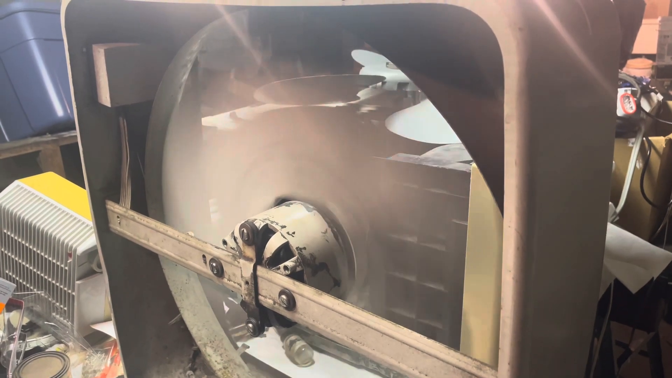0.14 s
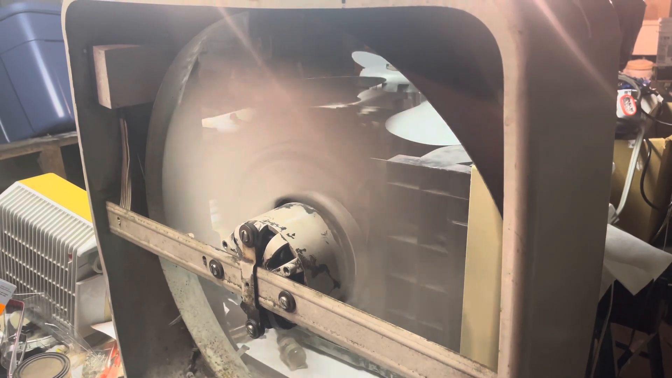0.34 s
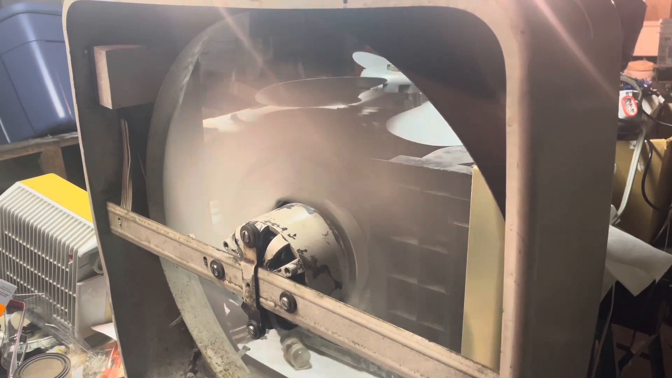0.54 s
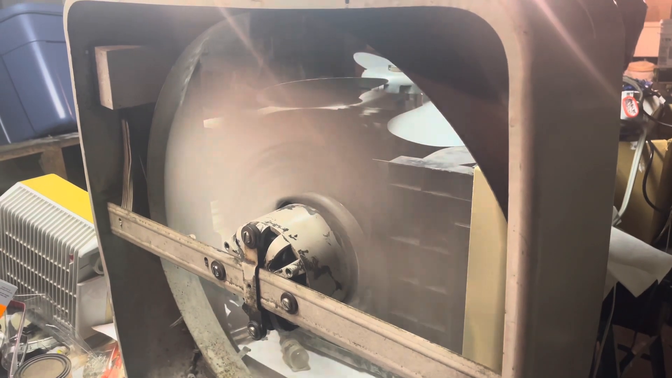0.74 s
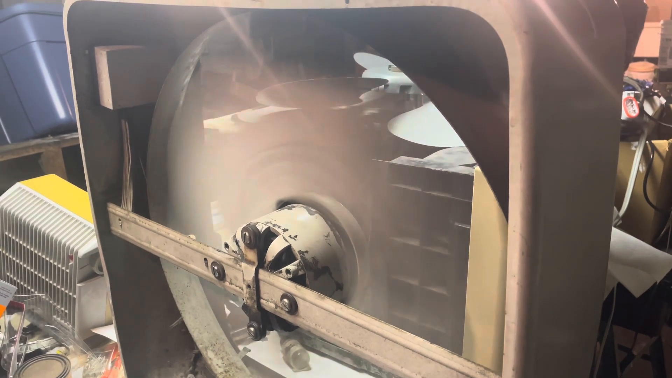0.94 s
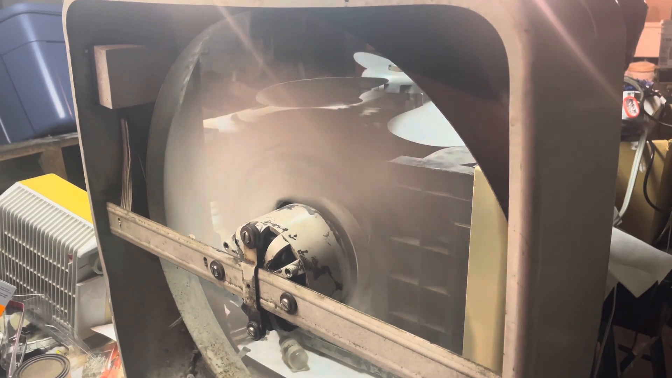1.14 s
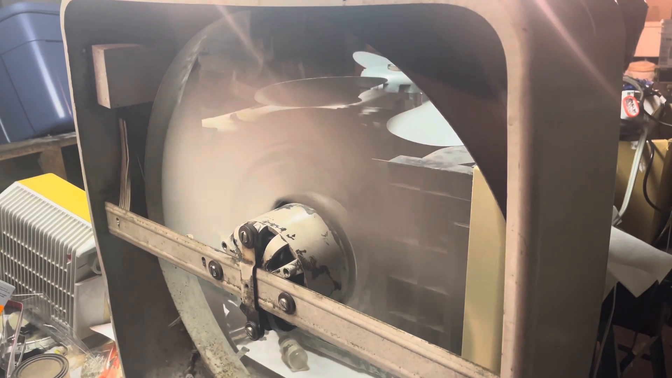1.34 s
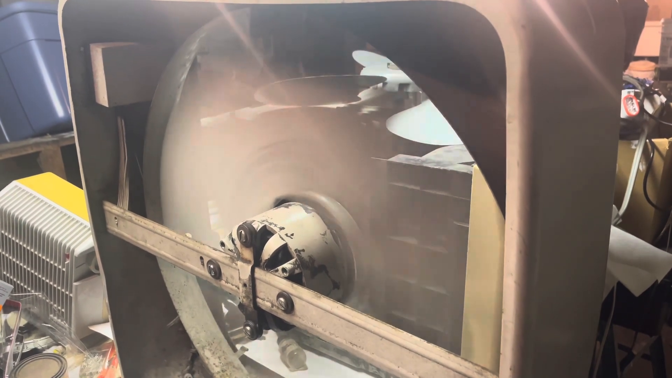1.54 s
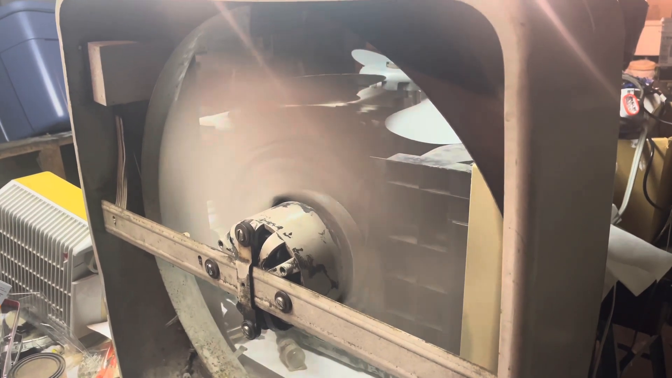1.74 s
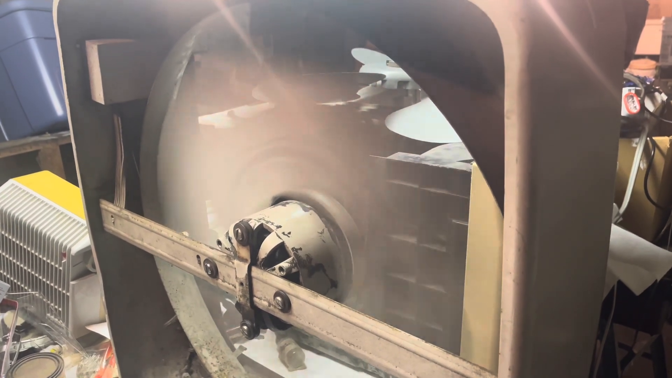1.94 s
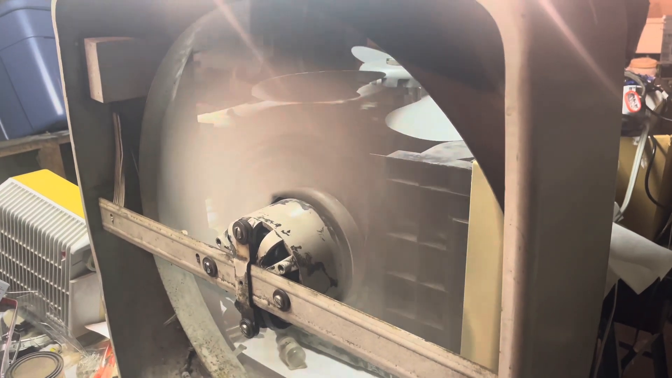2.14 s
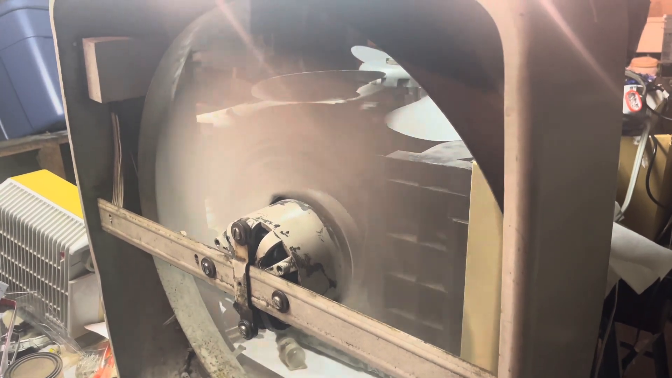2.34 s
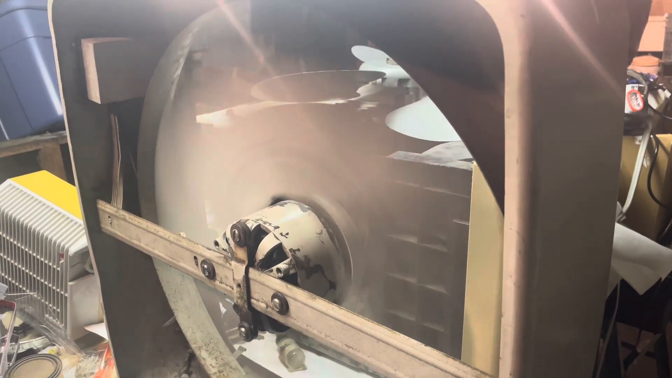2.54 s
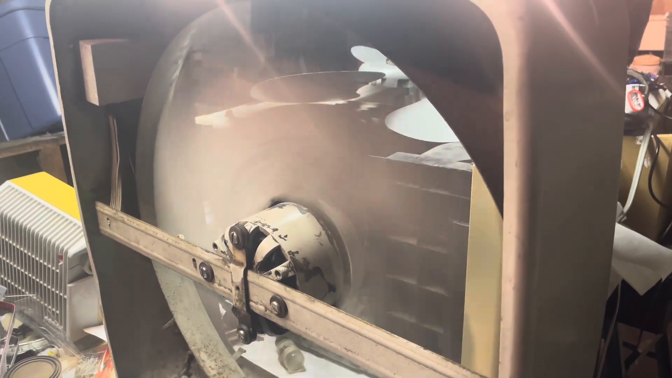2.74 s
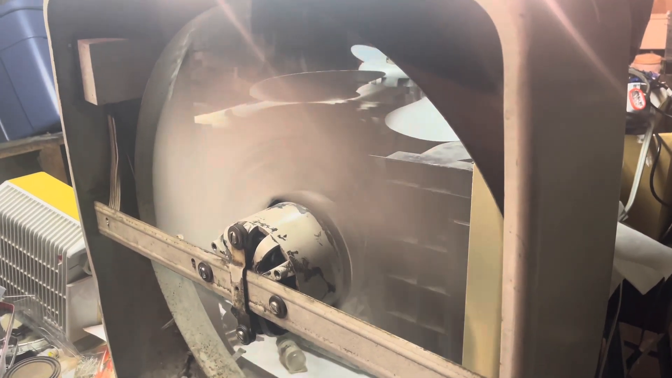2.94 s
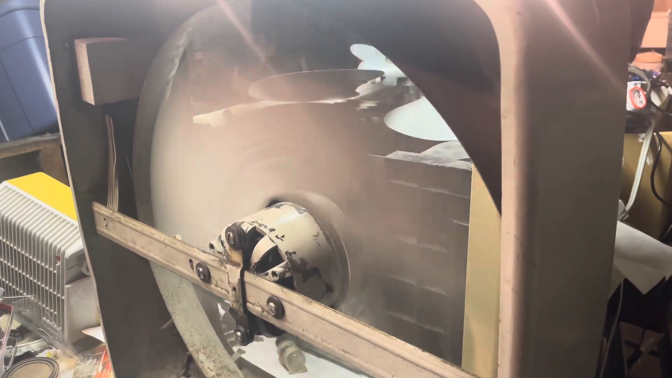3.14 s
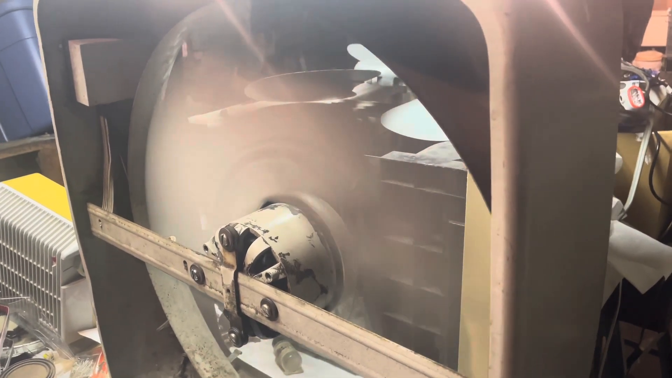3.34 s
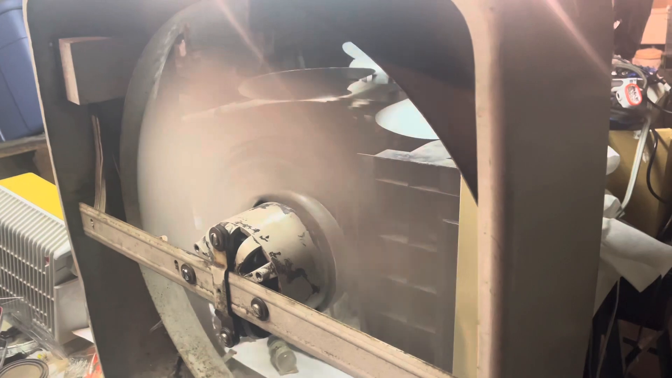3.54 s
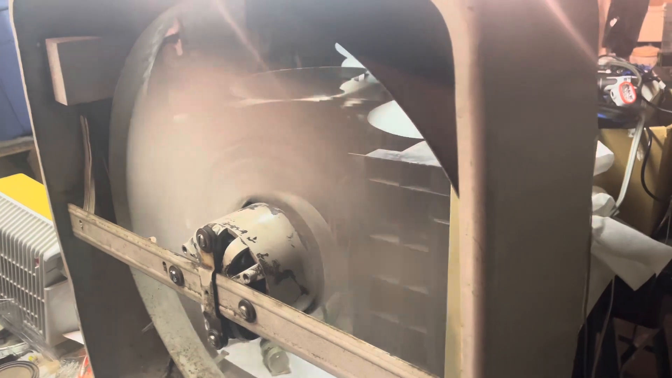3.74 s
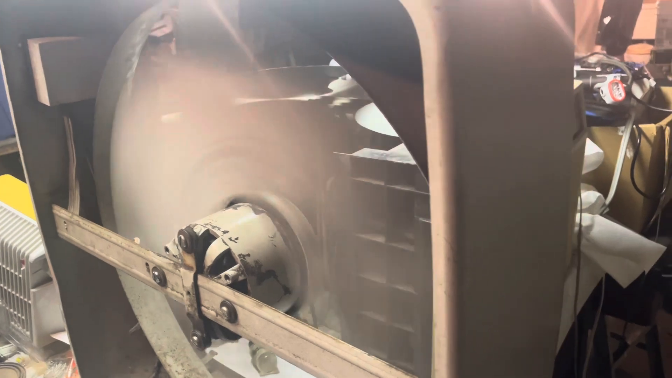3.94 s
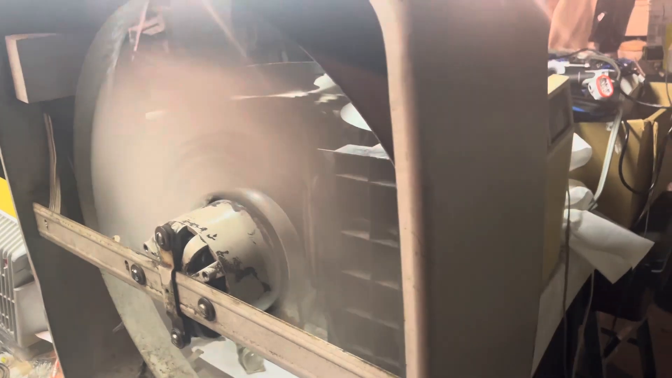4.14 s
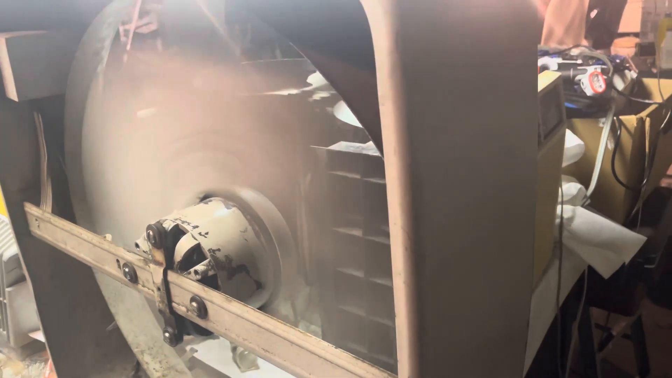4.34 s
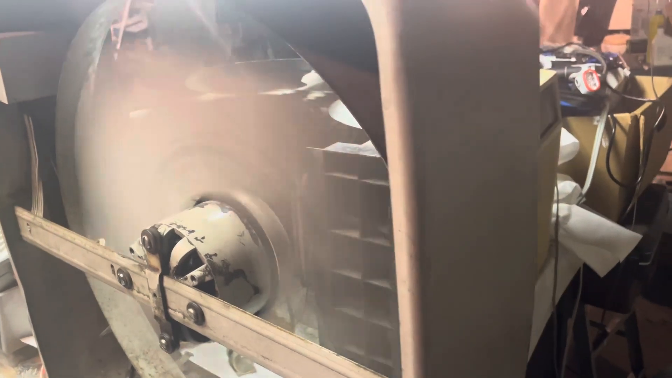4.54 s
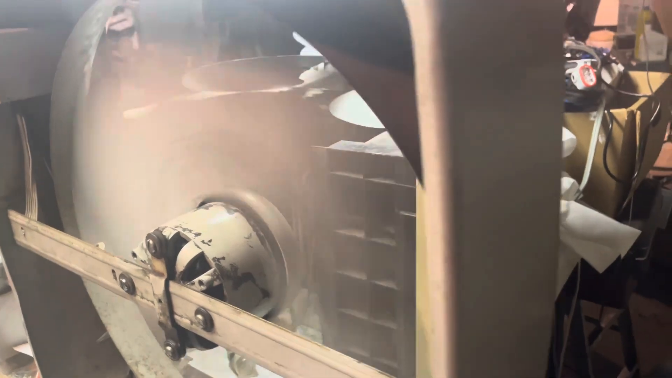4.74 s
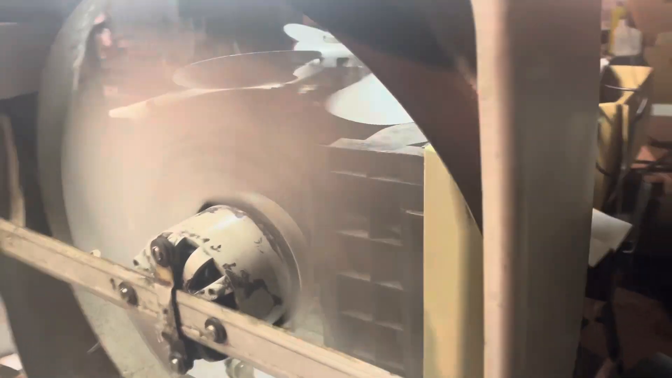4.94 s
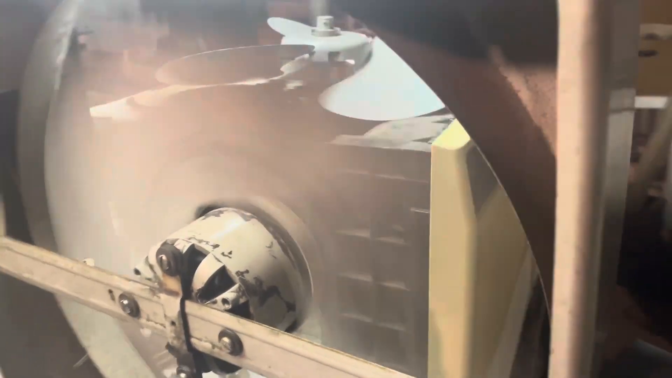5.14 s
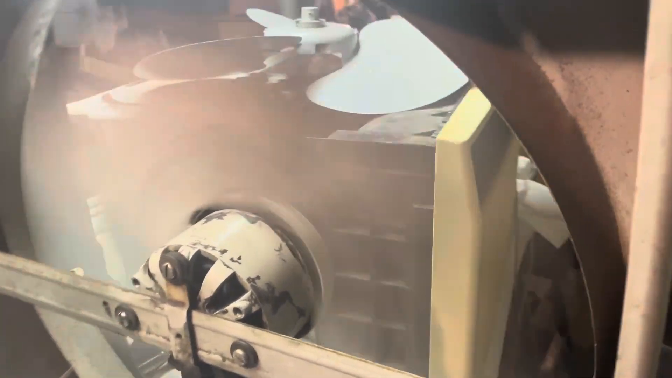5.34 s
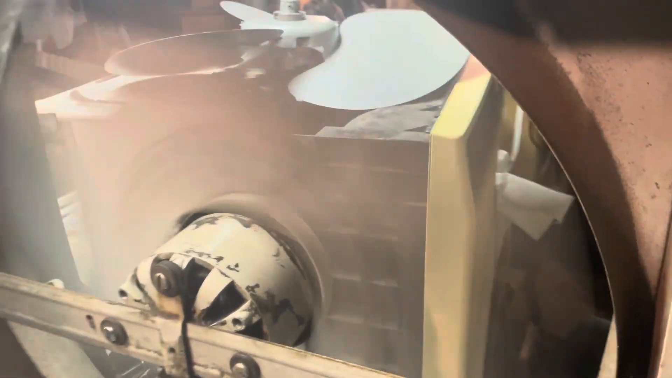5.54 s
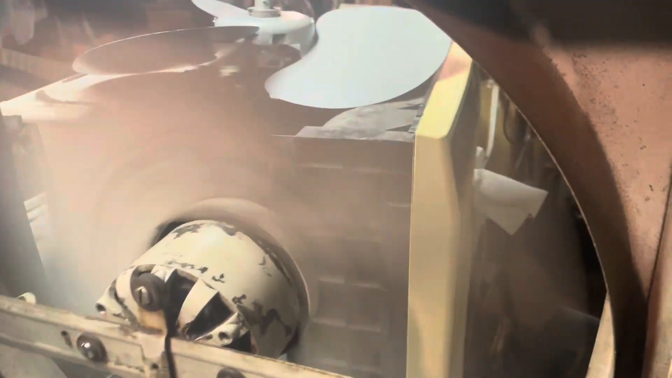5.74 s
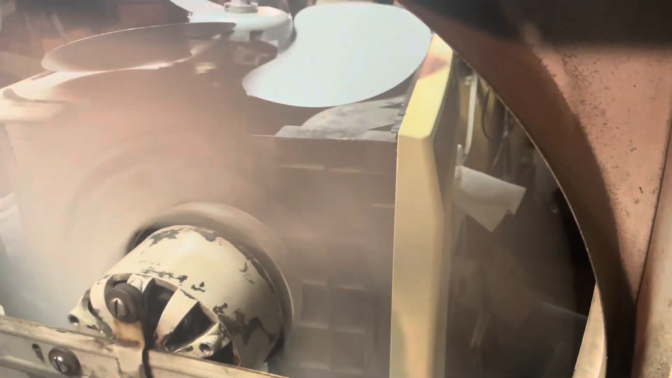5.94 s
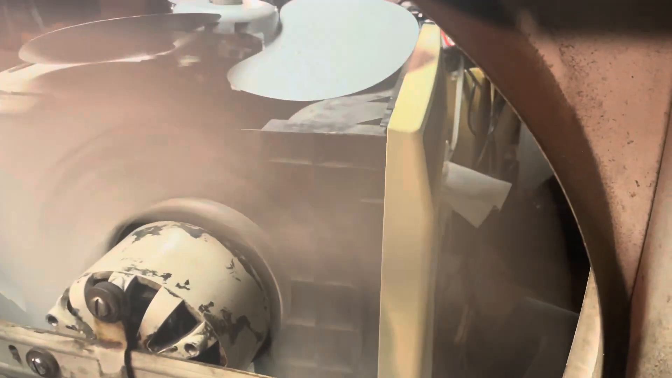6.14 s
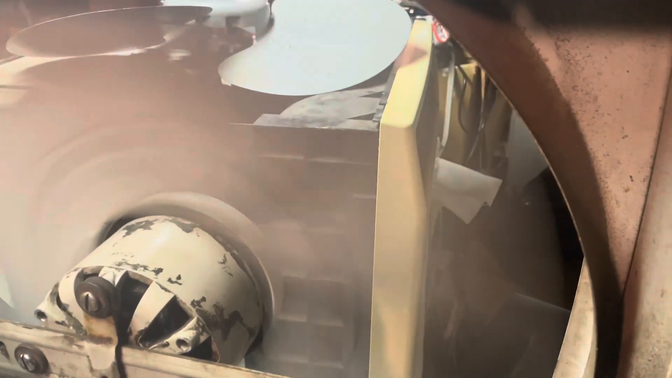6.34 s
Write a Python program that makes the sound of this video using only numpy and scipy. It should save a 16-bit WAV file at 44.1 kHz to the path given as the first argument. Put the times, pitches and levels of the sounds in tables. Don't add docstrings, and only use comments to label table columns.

```python
import sys
import numpy as np
from scipy import signal
from scipy.fft import rfft, irfft, next_fast_len
from scipy.io import wavfile
from scipy.ndimage import uniform_filter1d

SR = 44100
rng = np.random.default_rng(int(sys.argv[2]) if len(sys.argv) > 2 else 0)


def wrap_up_sound(samples):
    columns = np.atleast_2d(samples).T
    tamed = np.clip(columns, -1, 1)
    steps = np.round(tamed * 32767).astype(np.int16)
    wavfile.write(sys.argv[1], SR, steps)


def how_loud(loudness_db):
    steps = np.asarray(loudness_db, float) / 20
    return 10 ** steps


N = 286209
T = np.arange(N) / SR


def evened(x):
    return x / np.sqrt(np.mean(x ** 2) + 1e-20)


def columns(table, at, warp=np.asarray):
    key, *rest = np.transpose(table)
    return [np.interp(warp(at), warp(key), column) for column in rest]


def drift(rate_hz):
    coarse = T[::256]
    rates_hz = np.geomspace(.1, 1, num=12) * rate_hz
    slow = sum(np.sin(2 * np.pi * (f * coarse + rng.random())) for f in rates_hz)
    return np.interp(T, coarse, evened(slow))


# t/s, nearness/0-1, slide toward the rim/0-1
HAND_PATH = [(0, 0.08, 0.1), (1.5, 0.24, 0), (2.3, 0.23, .3), (3.4, 0.32, 0.78), (4, 0.33, 0.56),
             (4.6, 0.29, 0.97), (5, 0.52, 0.86), (5.3, 0.81, 0.97), (5.6, 0.91, 0.95), (5.85, 0.92, 0.97),
             (6.05, 0.91, 0.9), (6.3, 1.08, 0.96), (6.5, .95, 1)]


def hand(at_s=T):
    return columns(HAND_PATH, at_s)


def blade_rate():
    full_per_s, short_per_s, settle_s, creep_per_s2 = 49.387, 2.282, .9141, .0668
    return full_per_s - short_per_s / np.cosh(T / settle_s) ** 2 + creep_per_s2 * T


def spin_db(law):
    full_per_s = 49.387
    return 20 * law * np.log10(blade_rate() / full_per_s)


def blade_angle():
    start_turn = .82
    return 2 * np.pi * (start_turn + np.cumsum(blade_rate()) / SR)


# full-speed level/dB, power of speed, nearness gain/dB, slide gain/dB
BLADE_TONES = [(-40.5, 3.1, 17.5, 2), (-22.5, 2.7, 3, -0.85), (-53.5, 2.5, 2.5, 24)]
LEAD_FAR_RAD = (.5, -.25, 2.6)
LEAD_NEAR_RAD = (-.8, -.25, 1.7)
# multiple of blade rate, level/dB, lead/rad
BLADE_OVERTONES = [(4, -38.5, -1.4), (5, -46, 2.5), (6, -46, 2.1)]
# t/s, level/dB, width/ms
BLADE_LULLS = [
    (5.45, -5.5, 25),
    (5.58, -5, 30),
    (5.69, -6.5, 17),
    (6.47, -5.5, 21),
]


def blades(angle):
    near, slide = hand()
    partials = []
    for k, (db, law, near_db, slide_db) in enumerate(BLADE_TONES):
        level_db = db + spin_db(law) + near_db * near + slide_db * slide
        lead = LEAD_FAR_RAD[k] + near * (LEAD_NEAR_RAD[k] - LEAD_FAR_RAD[k])
        partials.append((k + 1, level_db, lead))
    for k, db, lead in BLADE_OVERTONES:
        partials.append((k, db + 1.2 * near + spin_db(11), lead))

    waver_db = 0.47 + 0.51 * near
    port_lead = np.array([[-.03], [.03]])
    tones = 0
    for k, level_db, lead in partials:
        gain = how_loud(level_db + waver_db * np.sqrt(k) * drift(6.))
        wander = 0.013 * k * waver_db * drift(5.)
        tones = tones + gain * np.cos(k * angle + lead + port_lead + wander)

    lull_db = sum(db * np.exp(-((T - s) * 1000 / ms) ** 2 / 2) for s, db, ms in BLADE_LULLS)
    port_db = np.array([[.65], [-.65]])
    return np.sqrt(2) * tones * how_loud(lull_db + port_db)


# f/Hz, level/dB, lead/rad, left over right/dB
HUM_LINES = [(119.97, -34.3, -1.2, 1.5), (239.97, -31, -2.7, -.6)]
# nearness gain/dB, slide gain/dB, power of speed
HUM_LINE_CHANGE = [(5.5, -2.5, 4.4), (3.5, -1.75, .3)]


def motor():
    near, slide = hand()
    hum = 0
    for (hz, db, lead, side_db), (near_db, slide_db, law) in zip(HUM_LINES, HUM_LINE_CHANGE):
        level_db = db + near_db * near ** 2 + slide_db * slide + spin_db(law)
        port_db = np.array([[side_db], [-side_db]]) / 2
        gain = how_loud(level_db + 0.2 * drift(5.4) + port_db)
        hum = hum + np.sqrt(2) * gain * np.cos(2 * np.pi * hz * T + lead)
    return hum


def air_db(full_db, near_db):
    return full_db + spin_db(3.1) + near_db * hand()[0] ** 2


# f/Hz, left over right/dB, likeness far, likeness near,
# left lead far/rad, left lead near/rad
PORTS = [(150, 0.5, 0.99, 0.9, 0.35, -0.35), (298, -1.2, 0.99, .98, -0.12, -0.14),
         (547, -0.1, 0.74, 0.9, 0.18, 0.64), (775, -4, 0.67, 1, 0.44, 1.04),
         (1280, -0.8, 0.76, 0.62, 0.58, 0.87), (1910, -3, 0.84, 0.14, 0.67, 4),
         (2350, -0.5, 0.18, 0.51, 1.8, -0.3), (3180, 5, 0.14, 0.5, 2, 0.8),
         (4070, 4.5, 0.8, 0.57, -1.4, 0.7), (5200, 4.5, 0.69, 0.54, -0.6, 1),
         (5480, 2, .7, .65, .1, .1), (5900, -.6, .5, .45, -1.4, -1.4),
                (6800, .6, .5, .5, -1.3, -1.3), (7600, .5, .72, .72, -2.05, -2.05),
                (8300, 0, .92, .93, -2.8, -2.85), (9400, 0, .89, .92, -3.55, -3.5),
                (10300, 0, .75, .75, -4.2, -4.2), (11800, 0, .78, .78, -5.1, -5.1),
                (12700, 0, .96, .96, -5.95, -5.95), (13300, 0, 1, 1, -6.283, -6.283)]


def air(colour, patchy_db, flicker_db, modes=(), gust=0):
    frames = N // 256 + 5
    hz = np.fft.rfftfreq(512, 1 / SR)[:, None] + 1
    near = np.clip(hand(np.arange(frames) * 256 / SR)[0], 0, 1)
    a, b, c, d, patches = rng.standard_normal((frames, 257, 5)).T
    patches = uniform_filter1d(patches, size=5, axis=0)
    patches = evened(uniform_filter1d(patches, size=8, axis=1))
    flicker = evened(uniform_filter1d(rng.standard_normal(frames), size=2))

    side_db, same_far, same_near, lead_far, lead_near = columns(PORTS, hz, np.log)
    same = np.clip(same_far + near * (same_near - same_far), 0, 1)
    lead = lead_far + near * (lead_near - lead_far)
    right = a + 1j * b
    left = same * right * np.exp(1j * lead) + np.sqrt(1 - same ** 2) * (c + 1j * d)
    z = np.array([left * how_loud(side_db / 2), right / how_loud(side_db / 2)])
    gusty = 1 + gust * near * (hz < 600)
    z = z * how_loud(gusty * patchy_db * patches + flicker_db * flicker)
    x = signal.istft(z, window="cosine", nperseg=512, noverlap=256)[1][:, :N]

    size = next_fast_len(N)
    fine_hz = np.fft.rfftfreq(size, 1 / SR) + 1
    ring_db = sum(db / (1 + (2 * (fine_hz - mode_hz) / width_hz) ** 2) for mode_hz, width_hz, db in modes)
    spectrum = rfft(x, size)
    far, close = (irfft(spectrum * how_loud(db + ring_db) / fine_hz, size)[:, :N]
                  for db in columns(colour, fine_hz, np.log))
    near = np.clip(hand()[0], 0, 1)
    return ((1 - near) * far + near * close) / np.sqrt(np.mean(far ** 2))


def chop(table, angle):
    near = hand()[0]
    power = 1
    for k, depth_far, depth_near, lead in table:
        depth = depth_far + near * (depth_near - depth_far)
        power = power + depth * np.cos(round(k) * angle + lead)
    return np.sqrt(np.clip(power, .02, None))


# f/Hz, far level/dB, near level/dB
RUSH_COLOUR = [(14, -74.5, -69.5), (42.7, -27, -24), (52.6, -21, -11.5), (71, -13, -9), (170, -5.5, -2.5),
               (275, -4, -3), (410, -7, -3), (596, 0.5, -3), (705, -2.5, -3.5), (830, 1, -3),
               (1260, -4.5, -3), (1635, -2, -6), (1890, -8.5, -7.5), (3540, -44.5, -47)]
# f/Hz, width/Hz, level/dB
HOUSING_MODES = [(343.7, 15, 2.5), (428, 17, -2.5), (453, 31, 3.), (530, 21, 0)]
RUSH_SWING = [(1, 0.12, 0.1, 2.6), (2, 0.31, 0.034, 3)]


def rush(angle):
    roar = air(RUSH_COLOUR, patchy_db=1., flicker_db=0.2, modes=HOUSING_MODES, gust=1.13)
    return how_loud(air_db(full_db=-28, near_db=5)) * chop(RUSH_SWING, angle) * roar


# f/Hz, far level/dB, near level/dB
HISS_COLOUR = [(900, -70, -70), (1850, -5.5, -10), (2220, 1.5, -1.5), (2630, -0.5, 4), (3350, 1, 1),
               (5320, -2, -1), (5500, -4.5, -4.5), (6840, 2.5, 2.5), (7800, -1, -1), (8850, 2.5, 3.5),
               (11100, -2, 1), (13700, -0.5, 1), (14700, -4, -3), (15800, -8, -9)]
HISS_SWING = [(1, .14, .2, .9), (2, .2, .14, 1.8)]
STRUT_SWING = [(1, 0.56, 0.2, 0.7), (2, 0.21, 0.23, 1.8), (3, 0.12, .17, 4.7)]


def hiss(angle):
    level_db = air_db(full_db=-47.5, near_db=3.5)
    hz, width_hz, strut_db, strut_near_db = 2218, 290, -50.5, 1.5
    band = [(20, -91, -89.5), (hz - 3 * width_hz, -30, -30), (hz - width_hz / 2, -3, -3),
            (hz + width_hz / 2, -3, -3), (hz + 3 * width_hz, -30, -30), (SR / 2, -60, -60)]
    strut_level_db = strut_db + level_db - level_db[0] + strut_near_db * hand()[0] ** 2
    wake = air(band, patchy_db=1.5, flicker_db=1.5)
    strut = how_loud(strut_level_db) * chop(STRUT_SWING, angle) ** 2 * wake
    tips = air(HISS_COLOUR, patchy_db=.7, flicker_db=.6)
    return how_loud(level_db) * chop(HISS_SWING, angle) * tips + strut


# t/s, level/dB, width/ms
SWIRL_DIPS = [
    (3.4715, -18, 0.89),
    (3.7127, -16, 0.89),
    (5.2420, -14, 0.47),
    (5.2816, -15, 1.5),
]


def eddies():
    dips = 0
    for s, db, ms in SWIRL_DIPS:
        u = np.clip((T - s) * 1000 / ms, -20, 20)
        dips = dips - how_loud(db) * (1 - u ** 2) * np.exp(-u ** 2 / 2)
    return dips


def scene():
    angle = blade_angle()
    return blades(angle) + motor() + rush(angle) + hiss(angle) + eddies()


def roll_off(x):
    return signal.sosfilt(signal.butter(12, 15700, fs=SR, output="sos"), x)


def record(dry):
    bass_cut = signal.butter(2, 18., "high", fs=SR, output="sos")
    mix = signal.sosfilt(bass_cut, dry)
    return roll_off(mix)


dry = scene()
out = record(dry)
wrap_up_sound(out)
```